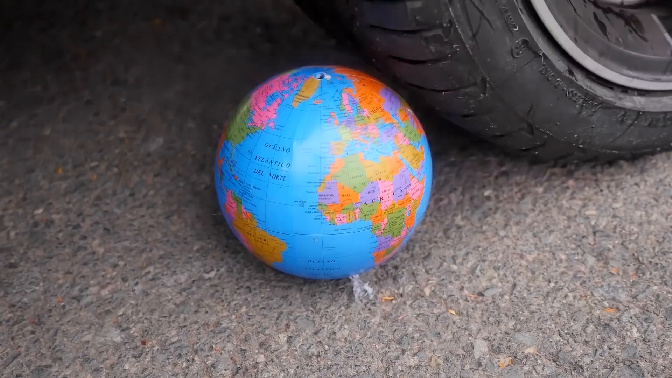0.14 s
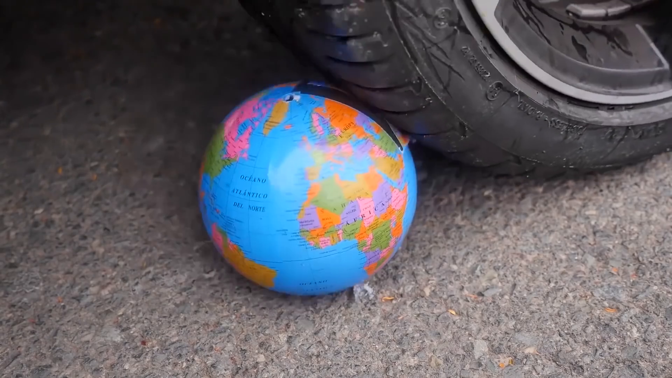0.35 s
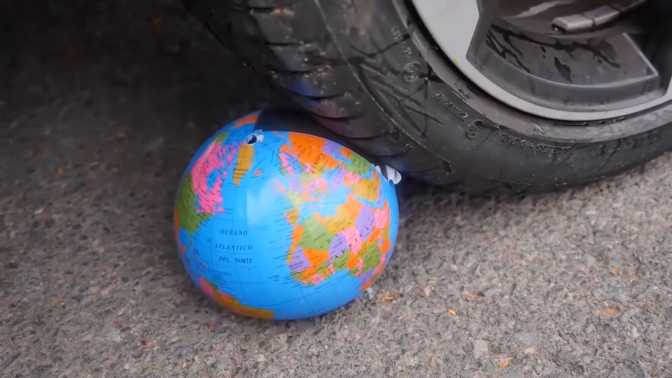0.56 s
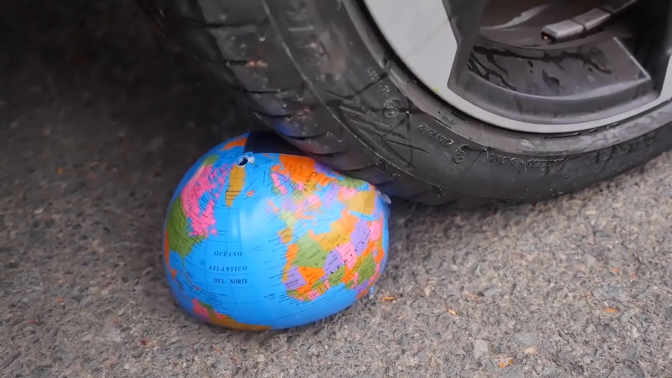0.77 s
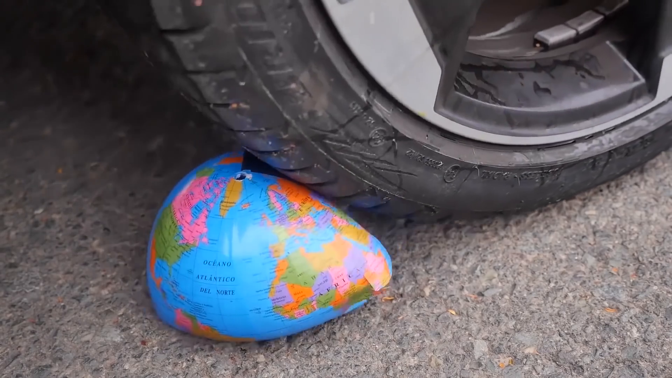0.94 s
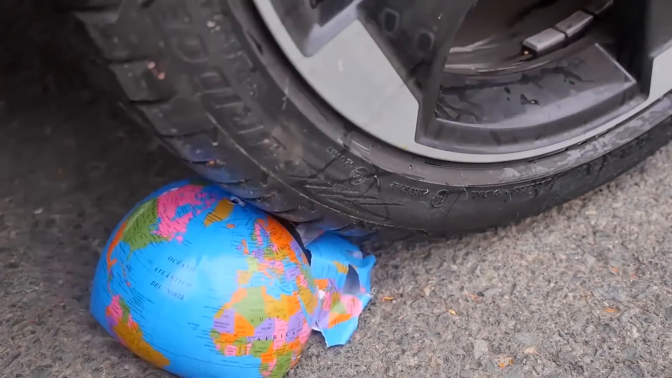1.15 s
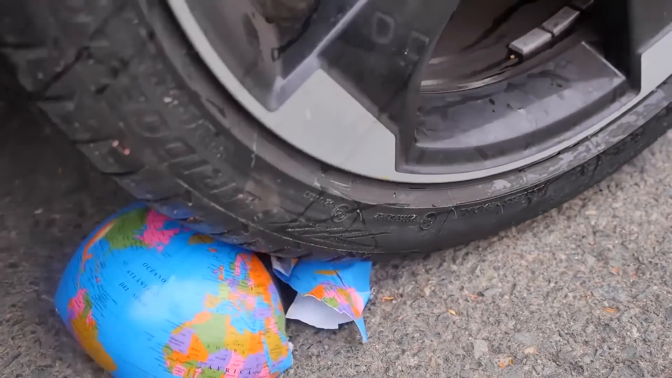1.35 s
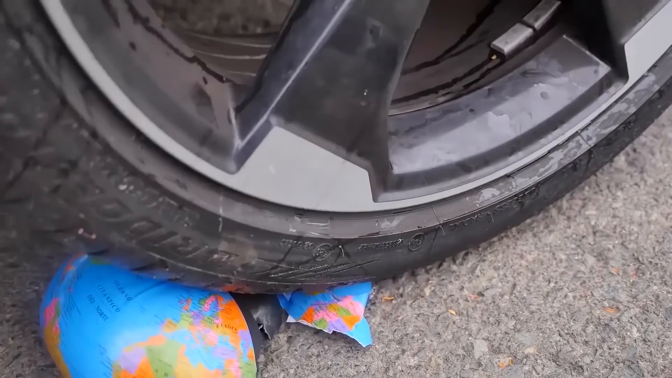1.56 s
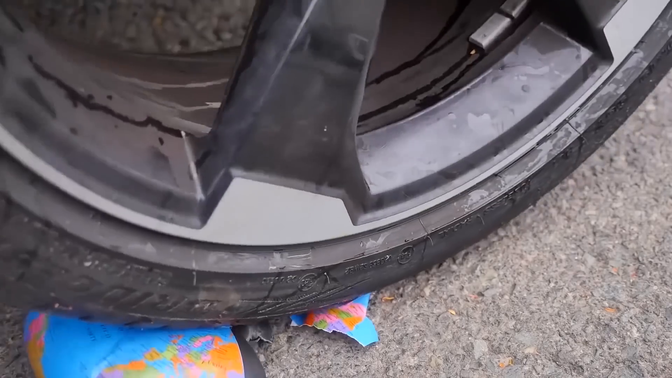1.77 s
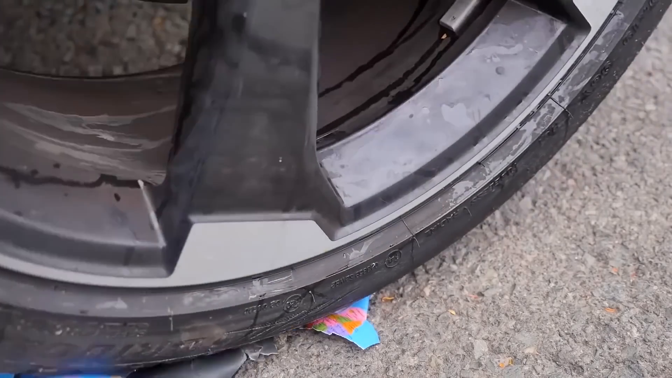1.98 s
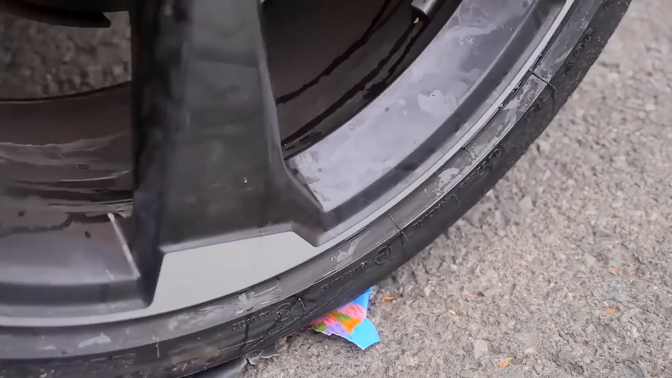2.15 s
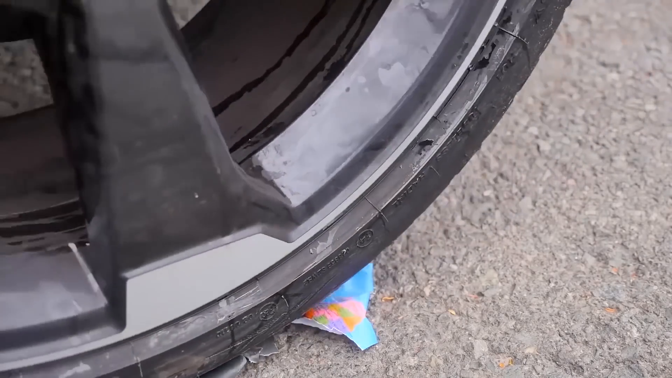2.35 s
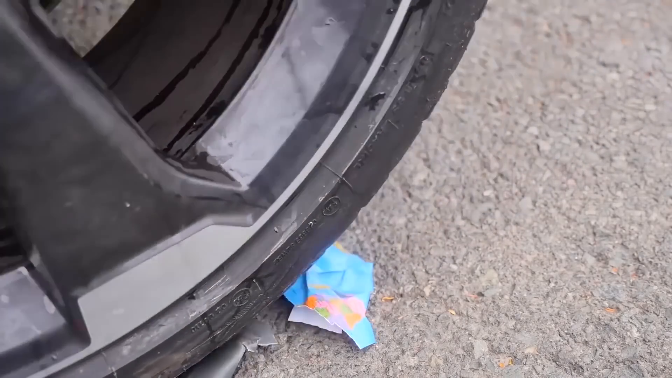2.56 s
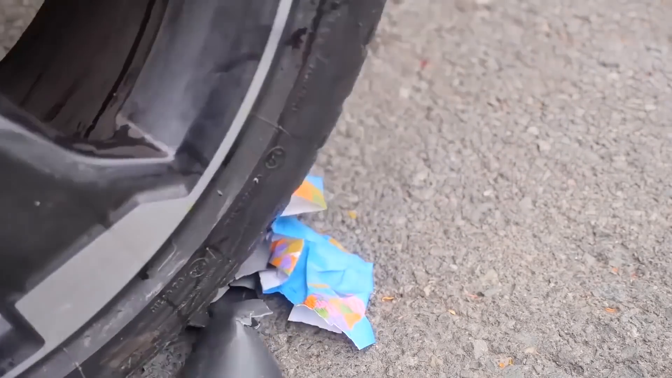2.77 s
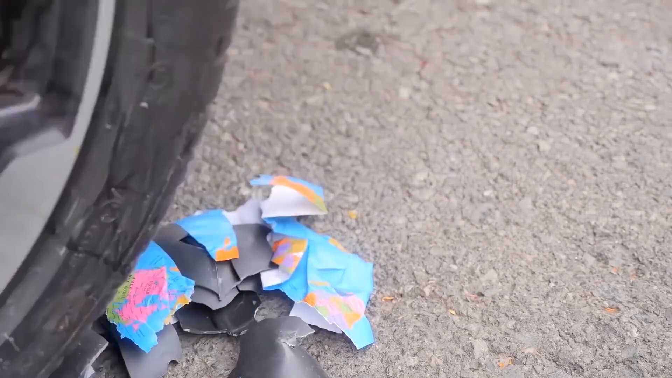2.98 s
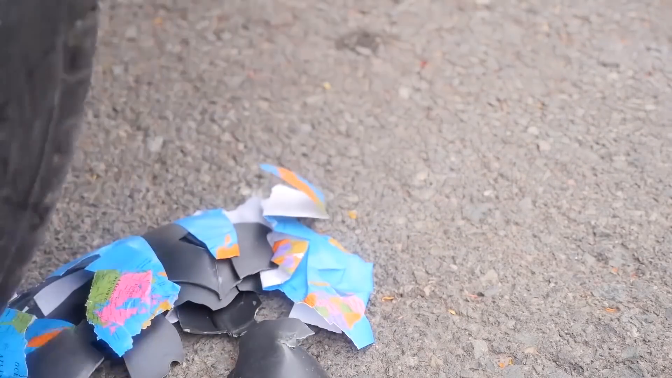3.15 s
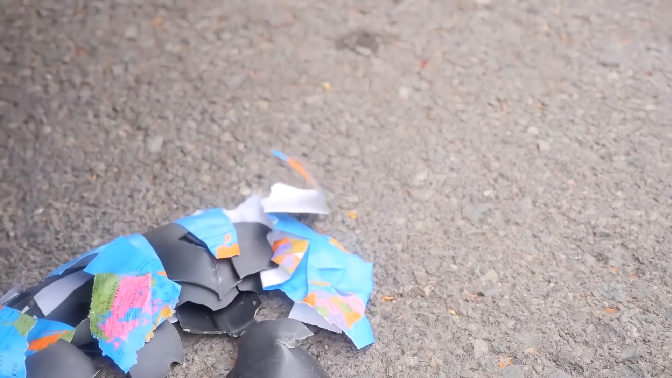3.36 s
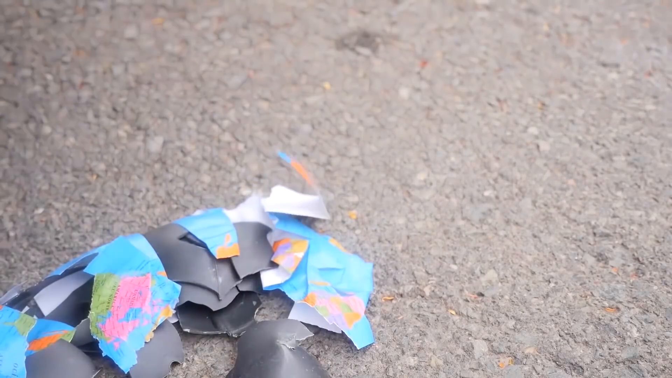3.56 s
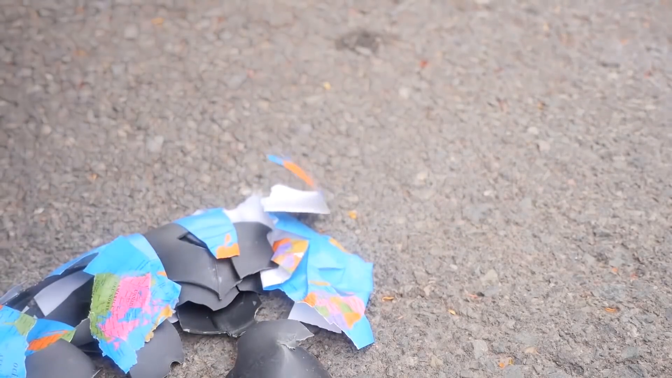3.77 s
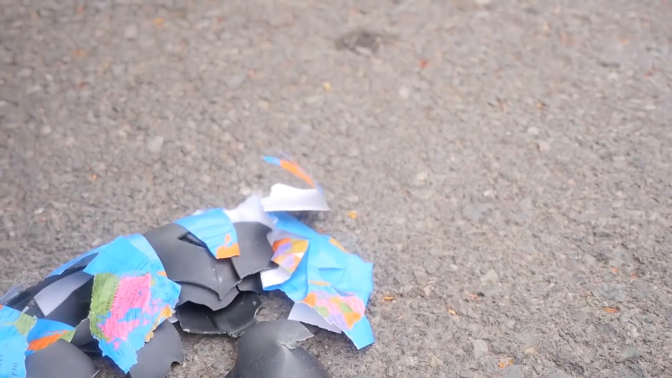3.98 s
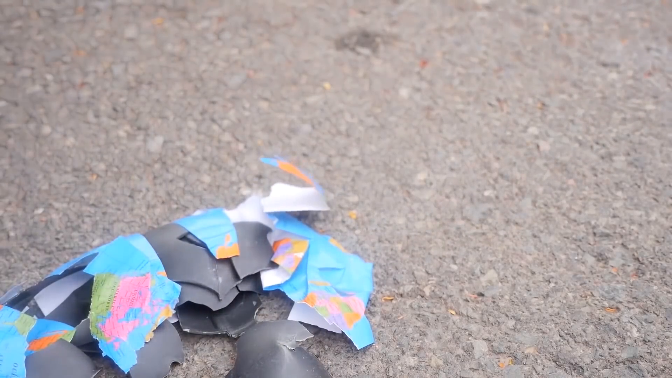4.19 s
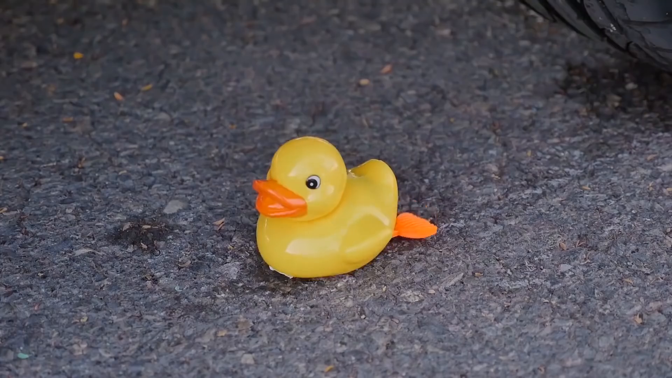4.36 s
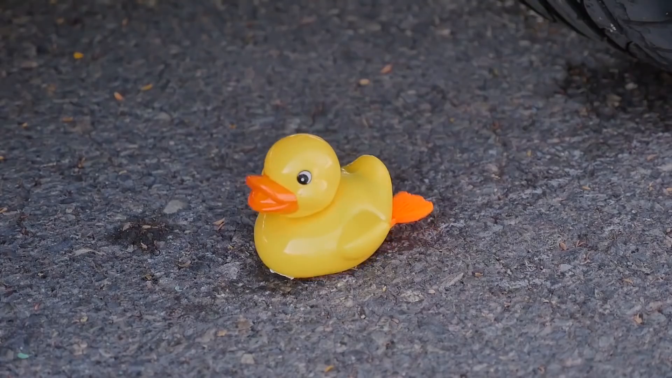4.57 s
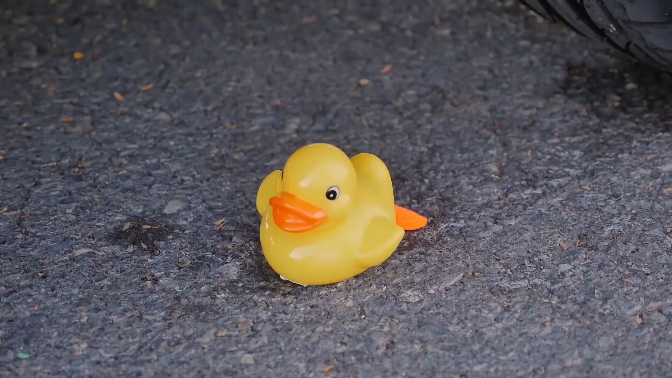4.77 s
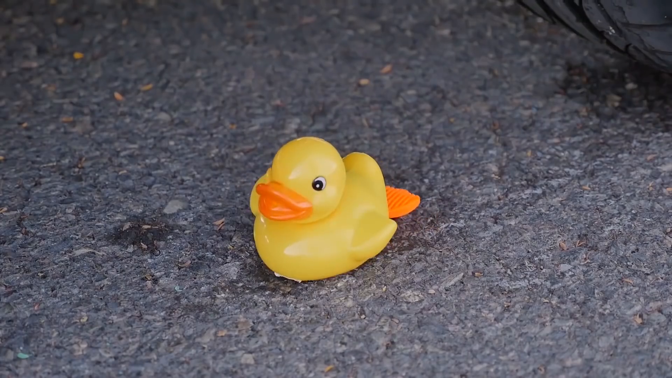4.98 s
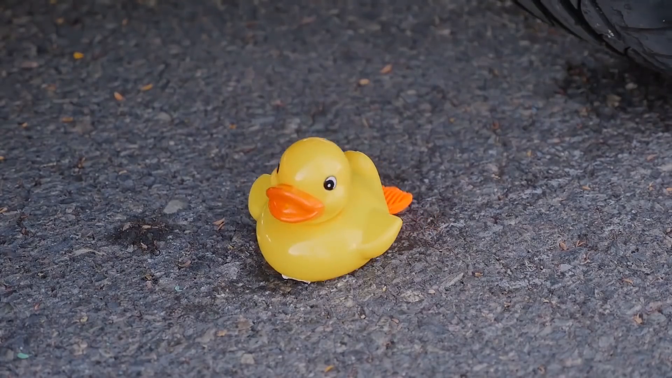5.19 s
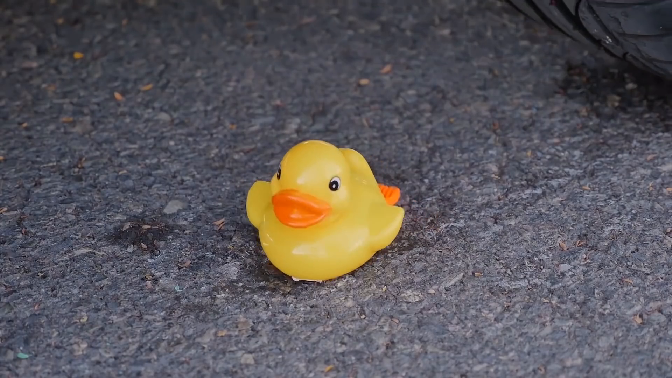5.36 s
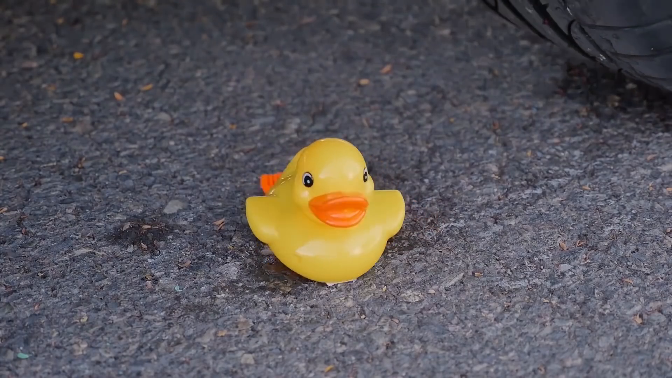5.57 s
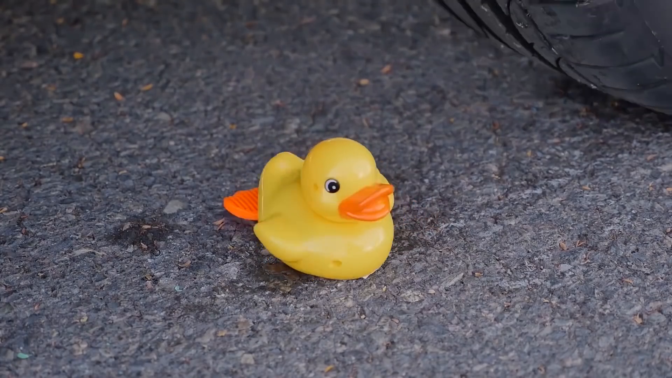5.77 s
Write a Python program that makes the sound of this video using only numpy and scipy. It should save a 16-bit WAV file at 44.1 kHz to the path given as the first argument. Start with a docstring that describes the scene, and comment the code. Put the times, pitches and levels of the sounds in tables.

```python
"""Sharp cracks, booms and crackle, almost all on the left; a lull; then a wind-up plastic duck rattles in the
centre. First scene: a car tyre crushes a hollow plastic globe on asphalt. Noise bursts excite shard modes and
the cavity, random clicks make the grinding, a wavering sine the thin ring of the shell, filtered noise the hum.
Second scene: clockwork strokes and gears are random clicks through the resonances of the duck's hollow body.
The close left microphone overloads: the loudest cracks thump low, peaks are rounded off, then the top is cut."""
import sys
import numpy as np
from scipy import signal
from scipy.fft import rfft, irfft
from scipy.io import wavfile
from scipy.ndimage import uniform_filter1d

SR = 44100
rng = np.random.default_rng(int(sys.argv[2]) if len(sys.argv) > 2 else 0)


def log_audio(samples):
    """Write samples as a 16-bit WAV file to the path given in sys.argv[1]."""
    # one column per channel
    frames = np.atleast_2d(samples).T
    # limit to full scale, then quantise
    limited = np.clip(frames, -1, 1)
    pcm = np.round(limited * 32767).astype(np.int16)
    wavfile.write(sys.argv[1], SR, pcm)


N = 257103

# Hum of the car and the street. Each row: time in seconds, level in dB.
HUM_LEVEL = [(0, -54), (.3, -50), (2.6, -50), (3.1, -51), (3.4, -62), (3.8, -62.5), (4.44, -58.5)]
# Hum spectrum. Each row: frequency in Hz, density in dB per Hz.
HUM_SPECTRUM = [(20, -16.5), (60, -9.5), (150, -0.5), (240, -7.5), (450, -0.5), (1000, -8), (2800, -11.5),
                (6000, -22.5), (16000, -30)]
# Tread grinding on the shell. Each row: time in seconds, crackle level in dB, cavity groan level in dB.
GRIND_LEVELS = [(.18, -63.5, -70), (.29, -53, -43), (.41, -28.5, -51), (.52, -34, -51), (.8, -31, -60.5),
                (.94, -28, -36), (1.04, -39.5, -32), (1.42, -21, -35.5), (1.54, -35.5, -43),
                (1.65, -26, -25.5), (1.9, -29.5, -34.5), (2.1, -42, -25), (2.28, -38.5, -36),
                (2.58, -34.5, -42.5), (2.76, -46, -44), (3.1, -43.5, -59), (3.45, -67.5, -82)]
# Crackle spectrum. Each row: frequency in Hz, density in dB per Hz.
CRACKLE_SPECTRUM = [(100, -23), (500, -7), (900, -6), (1800, 0.5), (3200, 0), (6000, -6.5), (12000, -12.5),
                    (16000, -20.5)]
# Hollow resonance of the globe: its pitch dips, climbs, then eases down.
# Each row: time in seconds, pitch in Hz, width in Hz, boom in dB under a 0 dB crack.
CAVITY_STATES = [(.35, 450, 220, -37.5), (.46, 734, 520, -16.5), (.87, 570, 450, -25),
                 (.96, 325, 89.5, -14), (1.17, 440, 101, -16), (1.45, 367, 45, -9.5),
                 (1.68, 454, 131, -15.5), (1.87, 570, 230, -14), (2.12, 646, 520, -13),
                 (2.45, 896, 850, -13.5), (2.8, 794, 900, -18), (3.3, 700, 900, -48)]
# Soft dull bumps. Each row: start in seconds, level in dB, pitch in Hz.
BUMPS = [(0.339, -39.5, 320), (0.626, -37, 428), (3.517, -45.5, 279), (3.574, -46.5, 237),
         (3.932, -51.5, 250), (3.991, -56.5, 238)]
# Shell cracks. Each row: start in seconds, shard ring in dB, treble snap in dB.
SHELL_CRACKS = [(0.369, -11, -33), (0.3818, -6, -25.5), (0.4033, -2.5, -18.5), (0.412, -13.5, -26.5),
                (0.4385, -15, -13), (0.4529, -3.5, -9), (0.4614, -9, -20.5), (0.5475, -14.5, -24),
                (0.5581, -1.5, -29), (0.605, -13.5, -21), (0.629, -20, -26), (0.6495, -13, -32.5),
                (0.691, -4.5, -10.5), (0.712, -14.5, -30.5), (0.7235, -6, -14.5), (0.778, -26, -27.5),
                (0.796, -19.5, -33), (0.8183, -6.5, -17), (0.8631, -12, -17.5), (0.8694, 1.5, -8),
                (0.9214, -8.5, -17.5), (0.9439, -16.5, -21.5), (0.964, -5, -12), (0.9875, -16.5, -16.5),
                (1.027, -11.5, -9), (1.0551, -15.5, -13), (1.1076, -6.5, -7.5), (1.1608, -4.5, -3.5),
                (1.2238, -4.5, -12), (1.2298, -3, -21), (1.392, -20.5, -27.5), (1.4075, -10.5, -9.5),
                (1.42, -5, -25.5), (1.449, -13, -22.5), (1.4827, -6.5, -9), (1.4916, -5, -9.5),
                (1.5593, -21.5, -24), (1.581, -24.5, -21), (1.628, -12, -34), (1.6419, -10, -11.5),
                (1.6569, -9, -25.5), (1.6723, -13, -20.5), (1.7053, -1.5, -5), (1.7443, -10.5, -16.5),
                (1.8076, -11.5, -7.5), (1.837, -11, -12.5), (1.8524, -11, -16.5), (1.8678, -15, -24),
                (1.899, -16.5, -22.5), (1.924, -4.5, -8.5), (1.9476, -16, -34), (1.9849, -9.5, -13.5),
                (2.01, -8.5, -7), (2.021, -13.5, -13.5), (2.0435, -7, -15), (2.0713, -14.5, -12.5),
                (2.0977, -19.5, -8.5), (2.1018, -4, -30), (2.117, -2.5, -9.5), (2.1268, -23, -14),
                (2.1866, -11, -18), (2.199, -4.5, -12.5), (2.3522, -25.5, -47), (2.417, -20, -31),
                (2.4413, -4.5, -8.5), (2.5006, -8, -12.5), (2.5718, -15.5, -27.5), (2.6005, -12, -17),
                (2.607, -10, -14), (2.6338, -7.5, -13), (2.6682, -6.5, -17.5), (2.7079, -15, -20),
                (2.785, -5, -16), (2.8572, -26, -28.5), (3.3101, -34, -38.5), (3.7462, -60, -50.5)]
# Shards ring lower as the shell slackens; the last small chips ring high. Each row: time in seconds, pitch in Hz.
SHARD_PITCHES = [(.37, 3344), (.62, 2573), (1.15, 2514), (2.1, 1774), (2.42, 1510), (2.56, 2250),
                 (2.7, 1970), (3.3, 3240)]
# Snap spectrum. Each row: frequency in Hz, density in dB per Hz.
SNAP_SPECTRUM = [(1500, -34), (3500, -6.5), (5000, 2), (7000, -2), (9000, -5.5), (12000, -5),
                 (15500, -15.5)]
# Low thump spectrum. Each row: frequency in Hz, density in dB per Hz.
THUMP_SPECTRUM = [(120, -10.5), (300, 3), (800, 3), (1500, -24)]
# Thin ring of the tightening shell. Each row: time in seconds, pitch in Hz, level in dB.
SQUEAK = [(.383, 1483, -23.5), (.405, 1734, -34), (.5, 1715, -48), (.74, 1730, -46.5)]
# Loose shell pieces tipping over as the tyre leaves. Each row: start in seconds, level in dB, pitch in Hz.
SHELL_TAPS = [(2.885, -21, 1860), (2.889, -19.5, 1810), (2.9, -18.5, 1880), (2.9363, -19, 1900),
              (2.98, -32, 1850), (3.022, -33.5, 1580), (3.055, -41, 1900), (3.094, -29.5, 1770)]
# Resonances of the duck's hollow body. Each row: frequency in Hz, width in Hz, height over the spectrum in dB.
DUCK_RESONANCES = [(1005, 124, 7.5), (1537, 103, 8), (1932, 143, 9.5), (2404, 340, 5), (3420, 360, 4),
                   (6400, 150, 11), (8140, 280, 6.5), (10500, 1300, 3), (15200, 300, 9)]
# Duck spectrum under the resonances. Each row: frequency in Hz, density in dB per Hz.
DUCK_SPECTRUM = [(100, -24.5), (210, -20), (320, -12), (560, -8), (690, -10.5), (850, 1), (1300, 0.5),
                 (2800, -1.5), (4000, -5), (5500, -5), (7500, -12), (12000, -15), (15500, -25.5)]
# The clockwork runs, catches for a moment and runs on. Each row: start in seconds, level in dB.
CLOCKWORK_RUNS = [(4.465, -4), (4.511, 0.5), (4.609, -2.5), (4.6642, 1), (4.8156, .5), (4.9706, 0.5),
                  (5.1796, .5), (5.3725, -0.5), (5.4295, 0.5), (5.7693, -0.5)]
# Strokes of a flap: out, back, rebound. Each row: share of the cycle, low knock in dB, high rasp in dB.
FLAP_STROKES = [(0, -20, -22.5), (.44, -26.5, -18.5), (.68, -27, -28)]

TOP_HZ = 15900
BURST_SAMPLES = 8192
TIME_S = np.arange(N) / SR
AGE_S = np.arange(BURST_SAMPLES) / SR
SHARD_SCATTER = 0.065  # spread of log pitch from shard to shard
BOOM_GROWTH = 0.79  # dB of boom per dB of crack
DUCK_START_S = 4.464
FLAPS_PER_S, CATCH_S = 20, .005  # approximate flap rate; pause at the end of each run
STROKE_SCATTER_DB, STROKE_JITTER_S = 1, .0015
RELEASE_DB = 1.5  # the first knock of a run lands harder
STALL_DB, STALL_S = -4.5, .006  # the rattle dips while the clockwork is caught


def undb(db):
    """Decibels to amplitude gain."""
    return 10 ** (np.asarray(db) / 20)


def curve(table, at_s):
    """Table columns, joined by straight lines and read at the given times."""
    times_s, *columns = np.transpose(table)
    return [np.interp(at_s, times_s, column) for column in columns]


def unit(x, span_s=None):
    """Scale to rms 1 over the first span_s seconds, or over the whole."""
    part = x[:int(span_s * SR)] if span_s else x
    return x / np.sqrt(np.mean(part ** 2) + 1e-18)


def add(track, start_s, x):
    """Mix a sound into a track at start_s."""
    i = int(start_s * SR)
    track[i:i + len(x)] += x[:max(N - i, 0)]


def band(x, hz, width_hz):
    """One resonance, gain 1 at its centre."""
    quality = hz / min(width_hz, SR / 4)
    return signal.lfilter(*signal.iirpeak(hz, quality, fs=SR), x)


def low_cut(x, hz):
    """Small bodies radiate almost no bass."""
    return signal.sosfilt(signal.butter(3, hz, "high", fs=SR, output="sos"), x)


def response(points, peaks=(), size=2048):
    """Causal (minimum-phase) impulse response of a spectrum with resonant peaks on top."""
    f_hz = np.maximum(np.arange(size // 2 + 1) * SR / size, 1)
    points_hz, points_db = np.transpose(points)
    db = np.interp(np.log(f_hz), np.log(points_hz), points_db)
    for centre_hz, width_hz, peak_db in peaks:
        db = db + peak_db / (1 + (2 * (f_hz - centre_hz) / width_hz) ** 2)
    # fold the cepstrum to its causal half
    cepstrum = irfft(np.log(undb(db)))
    cepstrum[1:size // 2] *= 2
    cepstrum[size // 2 + 1:] = 0
    return irfft(np.exp(rfft(cepstrum)))


def through(x, impulse):
    """Pass a sound through an impulse response."""
    return signal.fftconvolve(x, impulse)[:len(x)]


def clicks(per_s, spread_db, size):
    """Random one-sample clicks, mostly small and a few large."""
    strength = undb(spread_db * np.minimum(rng.exponential(size=size), 4))
    sign = rng.choice([-1, 1], size)
    return (rng.random(size) < per_s / SR) * sign * strength


def walk(rate_hz, size=N):
    """Random wander of rms 1: smoothed random steps."""
    k = int(SR / rate_hz)
    steps = np.repeat(rng.standard_normal(size // k + 1), k)
    return unit(uniform_filter1d(steps, k)[:size])


def fracture(split_s, scatter_db, scatter_s, echo_db, echo_s, splinter_db):
    """Noise burst: a running split, its uneven splintering aftermath and a faint echo from the car body."""
    split = np.exp(-AGE_S / split_s)
    splinters = undb(splinter_db * walk(750, size=BURST_SAMPLES))
    scatter = undb(scatter_db) * splinters * np.exp(-AGE_S / scatter_s)
    echo = undb(echo_db) * np.exp(-AGE_S / echo_s)
    return (split + scatter + echo) * rng.standard_normal(BURST_SAMPLES)


def street():
    """The low, slightly wavering hum of car and street: filtered noise."""
    level_db, = curve(HUM_LEVEL, TIME_S)
    hum = through(rng.standard_normal(N), response(HUM_SPECTRUM))
    return unit(hum) * undb(level_db + 0.52 * walk(6.2))


def crackling():
    """Splinters and grit crackle under the tread: random clicks, each with a short noisy ring."""
    grit = np.zeros(N)
    for _ in range(4):
        # each patch of grit has its own ring
        ring = fracture(split_s=0.00017, scatter_db=-6.0, scatter_s=0.0036,
                        echo_db=-38, echo_s=.025, splinter_db=-1.5)
        grit += through(clicks(per_s=150, spread_db=5, size=N), ring)
    crackle = unit(through(grit, response(CRACKLE_SPECTRUM))) * undb(2 * walk(30))
    # slightly bright at first, dullest near 1.4 s, clearer by 2.6 s, then duller again
    dull = signal.lfilter(*signal.butter(1, 2000, fs=SR), crackle)
    dull_share = np.interp(TIME_S, [.8, 1.4, 2.6, 3.0], [-0.16, 0.59, 0, 0.44])
    return crackle + dull_share * (dull - crackle)


def groaning():
    """The buckling shell slips in small jerks that excite its wall and the changing cavity."""
    slips = clicks(per_s=170, spread_db=4, size=N)
    wall = unit(band(band(slips, 450, 240), 400, 600))
    groan = np.zeros(N)
    times_s = np.transpose(CAVITY_STATES)[0]
    # crossfade from each cavity state to the next
    for (_, hz, width_hz, _), share in zip(CAVITY_STATES, np.eye(len(CAVITY_STATES))):
        air = unit(band(band(slips, hz, 0.62 * width_hz), hz, 450))
        groan += np.interp(TIME_S, times_s, share) * (air + undb(-6.5) * width_hz / hz * wall)
    return low_cut(groan, 220)


def grinding():
    """Crackle of splinters and groan of the cavity, each following its level in time."""
    crackle_db, groan_db = curve(GRIND_LEVELS, TIME_S)
    return undb(crackle_db) * crackling() + undb(groan_db) * groaning()


def knocks():
    """Soft, dull bumps: swelling and dying noise through one low resonance and a low-pass."""
    out = np.zeros(N)
    muffle = signal.butter(3, 480, fs=SR)
    for start_s, level_db, hz in BUMPS:
        push = rng.standard_normal(BURST_SAMPLES) * np.sqrt(AGE_S) * np.exp(-AGE_S / 0.013)
        bump = signal.lfilter(*muffle, band(push, hz, 180))
        add(out, start_s, undb(level_db) * unit(bump, 0.0197))
    return out


def shard(hz, ring_s, spread, count=7):
    """A fresh piece of shell rings in its own few modes, the low ones longest."""
    place, size = rng.uniform(-1.027, 1, (2, count, 1))
    modes_hz = np.minimum(hz * np.exp(spread * place), TOP_HZ)
    decay = np.exp(-AGE_S * modes_hz / hz / ring_s)
    return (size * np.sin(2 * np.pi * modes_hz * AGE_S) * decay).sum(0)


def shell_ring(split, hz):
    """The split excites a broad shell resonance and the modes of a shard."""
    shell = unit(band(band(split, hz, 1.5 * hz), hz, 2.24 * hz), 0.0035)
    modes = unit(shard(hz, ring_s=0.0027, spread=.48), 0.0022)
    return unit(low_cut(shell + modes, 670), 0.0045)


def cavity_boom(split, cavity_hz, width_hz):
    """The released wall pushes on the air inside, and flexes at a low pitch itself."""
    # the sudden release is one clean push
    push = unit(split, 0.0087) + 22 * (AGE_S == 0)
    air = unit(band(band(push, cavity_hz, width_hz), cavity_hz, 670), 0.037)
    wall = unit(band(band(push, 380, 260), 350, 700), 0.009)
    # a torn, leaky cavity leaves more of the knock to the wall
    return unit(low_cut(air + undb(-2.5) * width_hz / cavity_hz * wall, 280), 0.024)


def globe_cracks():
    """Each split snaps, rings a shard and knocks on the cavity; with the loudest, the overloading microphone
    adds a steeply growing low thump."""
    out = np.zeros(N)
    snap_ir, thump_ir = response(SNAP_SPECTRUM), response(THUMP_SPECTRUM)
    for start_s, ring_db, snap_db in SHELL_CRACKS:
        hz = curve(SHARD_PITCHES, start_s)[0] * np.exp(SHARD_SCATTER * rng.standard_normal())
        split = fracture(split_s=0.0015, scatter_db=-7, scatter_s=0.01,
                         echo_db=-30.5, echo_s=0.011, splinter_db=2.0)
        tear = fracture(split_s=0.00095, scatter_db=-9.5, scatter_s=.007,
                        echo_db=-36.0, echo_s=0.023, splinter_db=2.0)
        ring = undb(ring_db) * shell_ring(split, hz)
        snap = undb(snap_db) * unit(through(tear, snap_ir), 0.0045)
        cavity_hz, width_hz, cavity_db = curve(CAVITY_STATES, start_s)
        boom = undb(cavity_db + BOOM_GROWTH * ring_db) * cavity_boom(split, cavity_hz, width_hz)
        # 3.9 dB of thump per dB of crack
        thump = undb(3.9 * ring_db - 29.5) * unit(through(split, thump_ir), 0.005)
        add(out, start_s, ring + snap + boom + thump)
    return out


def creak():
    """The tightening shell rings thinly: a sine tone, wavering in pitch and level."""
    hz, level_db = curve(SQUEAK, TIME_S)
    phase = 2 * np.pi * np.cumsum(hz * (1 + .008 * walk(120))) / SR
    touching = (TIME_S > SQUEAK[0][0]) & (TIME_S < SQUEAK[-1][0])
    return touching * unit(np.sin(phase)) * undb(level_db + 3 * walk(60))


def tocks():
    """Freed pieces of shell tap the road: noise bursts with a short hollow ring."""
    out = np.zeros(N)
    for start_s, level_db, hz in SHELL_TAPS:
        tap = fracture(split_s=0.0012, scatter_db=-8.5, scatter_s=0.0063,
                       echo_db=-28, echo_s=0.04, splinter_db=4.5)
        add(out, start_s, undb(level_db) * unit(band(band(tap, hz, 390), hz, 3800), 0.0041))
    return out


def duck_strokes():
    """Each run holds whole, even flaps until the next catch; yields (s, knock dB, rasp dB) per stroke."""
    ends_s = [run[0] for run in CLOCKWORK_RUNS[1:]] + [N / SR]
    for (start_s, run_db), end_s in zip(CLOCKWORK_RUNS, ends_s):
        flaps = round((end_s - start_s) * FLAPS_PER_S)
        cycle_s = (end_s - start_s - CATCH_S) / flaps
        for flap in range(flaps):
            for k, (share, knock_db, rasp_db) in enumerate(FLAP_STROKES):
                late, knock, rasp = rng.standard_normal(3)
                release_db = RELEASE_DB * (flap == k == 0)
                stroke_s = start_s + (flap + share) * cycle_s + STROKE_JITTER_S * late
                yield (stroke_s,
                       run_db + knock_db + release_db + STROKE_SCATTER_DB * knock,
                       run_db + rasp_db + STROKE_SCATTER_DB * rasp)


def stalls():
    """Gain of the rattle: it dips just before each new run."""
    dips = sum(np.exp(-((TIME_S - start_s + STALL_S) / STALL_S) ** 2) for start_s, _ in CLOCKWORK_RUNS[1:])
    return undb(STALL_DB * dips)


def wind_up_duck():
    """Clockwork flaps the duck about 20 times a second; each stroke chatters loose parts in the hollow body."""
    out = np.zeros(N)
    lead_s = 0.0045
    # the slack is taken up briefly before the stroke lands, then the chatter dies away
    envelope = np.minimum(np.exp((AGE_S - lead_s) / 0.0015), np.exp(-(AGE_S - lead_s) / 0.009))
    body = response(DUCK_SPECTRUM, DUCK_RESONANCES)
    crossover = signal.butter(2, 4000, fs=SR), signal.butter(2, 4000, "high", fs=SR)
    contact_hz = np.geomspace(500, TOP_HZ, num=14)
    for stroke_s, knock_db, rasp_db in duck_strokes():
        # every stroke lands a little differently and favours other pitches
        contact_db = 1.8 * rng.standard_normal(len(contact_hz))
        contact = response(np.transpose([contact_hz, contact_db]))
        for level_db, side in zip((knock_db, rasp_db), crossover):
            chatter = through(envelope * clicks(per_s=8000, spread_db=2.5, size=BURST_SAMPLES), body)
            sound = unit(signal.lfilter(*side, through(chatter, contact)), 0.014)
            add(out, stroke_s - .003, undb(level_db - 1.5) * sound)
    gears = unit(through(clicks(per_s=2100, spread_db=3, size=N), body)) * undb(4.6 * walk(60))
    return (out + undb(-26) * gears) * stalls()


def scene():
    """The globe is heard almost wholly on the left; then the duck takes over in the centre."""
    left = street() + grinding() + knocks() + globe_cracks() + creak() + tocks()
    right = undb(-24.5) * left + undb(-24) * street()
    return np.where(TIME_S < DUCK_START_S, np.array([left, right]), wind_up_duck())


def record(dry):
    """The loudest peaks flatten smoothly towards full scale; the top is cut."""
    rounded = dry / (1 + dry ** 6) ** (1 / 6)
    lowpass = signal.ellip(10, .1, 80, TOP_HZ, fs=SR, output="sos")
    return signal.sosfilt(lowpass, .88 * rounded)


dry = scene()
out = record(dry)
log_audio(out)
```